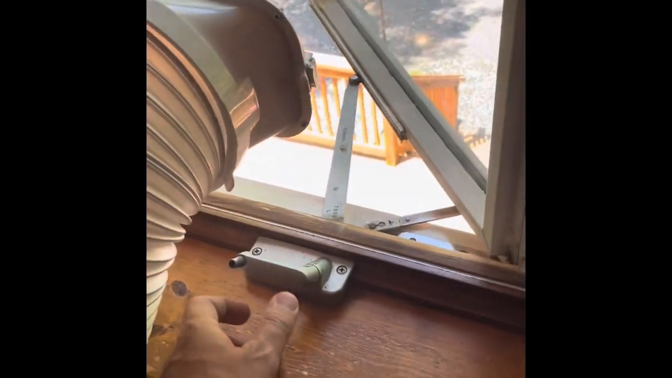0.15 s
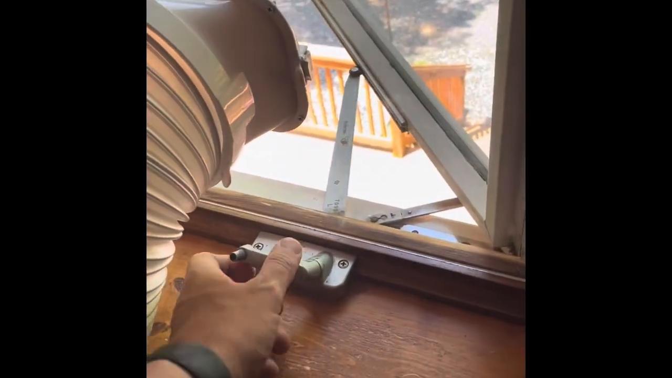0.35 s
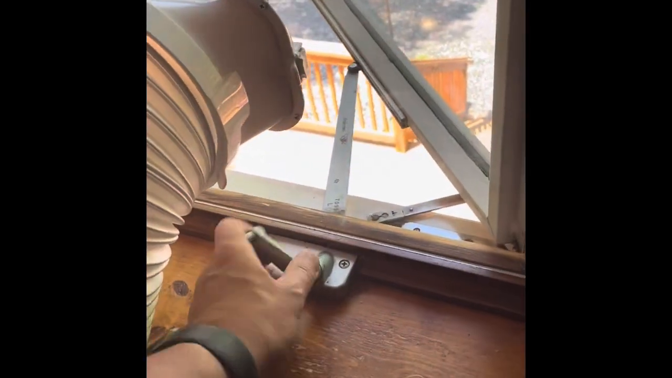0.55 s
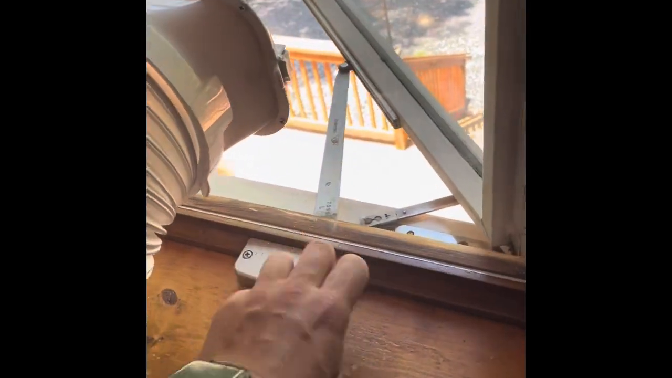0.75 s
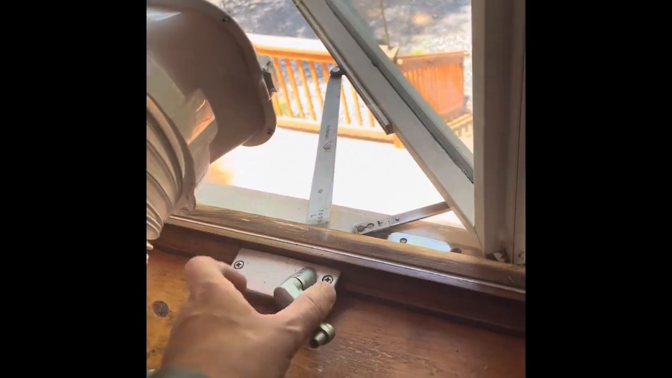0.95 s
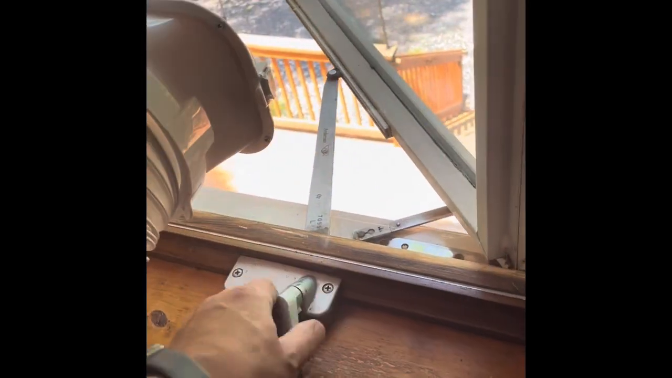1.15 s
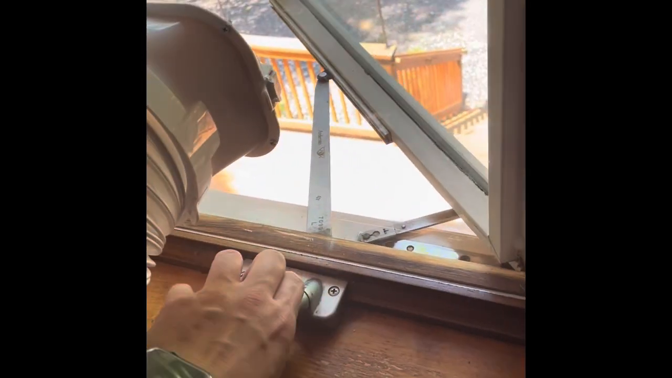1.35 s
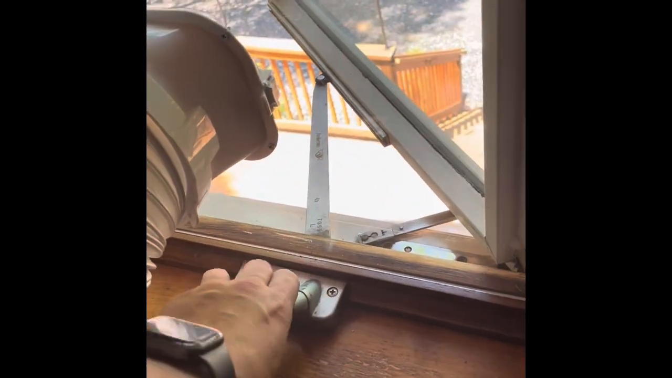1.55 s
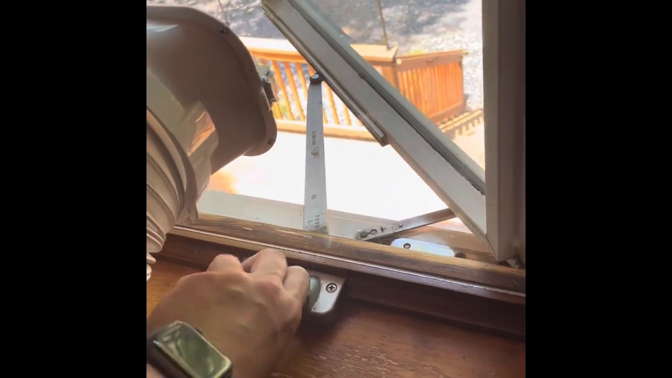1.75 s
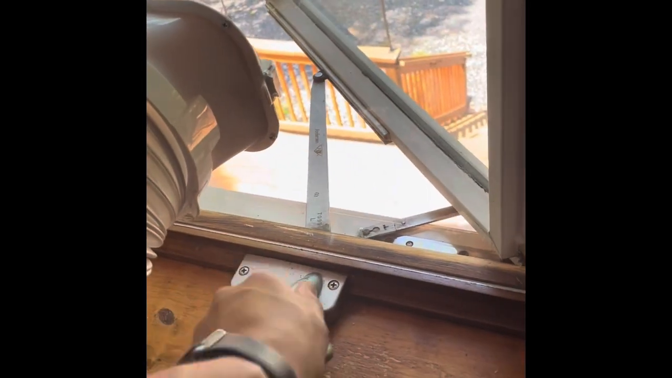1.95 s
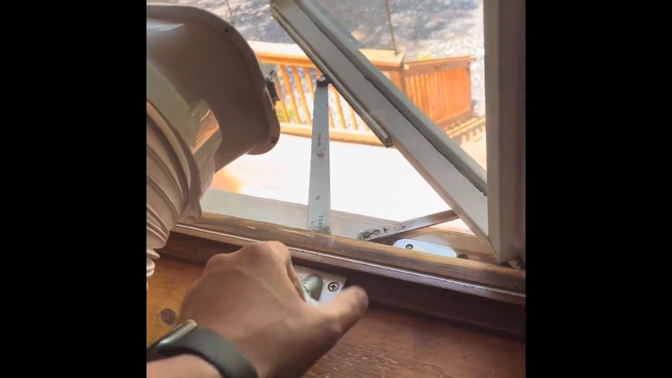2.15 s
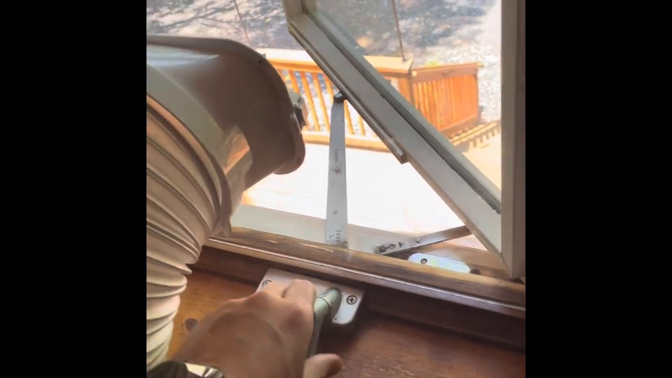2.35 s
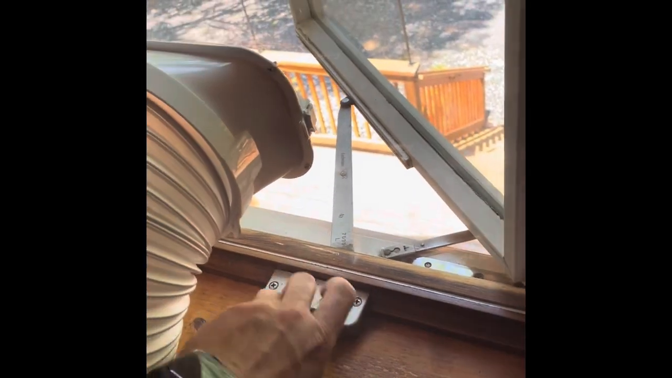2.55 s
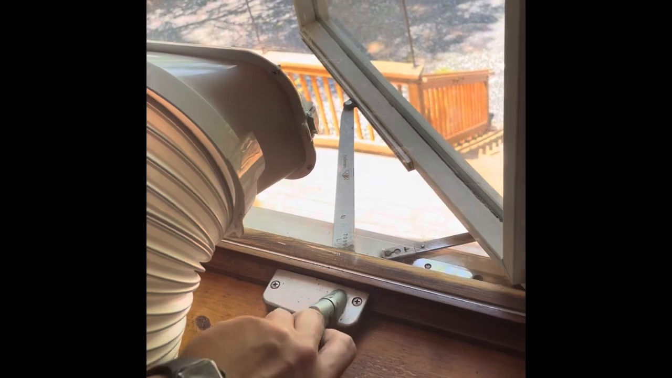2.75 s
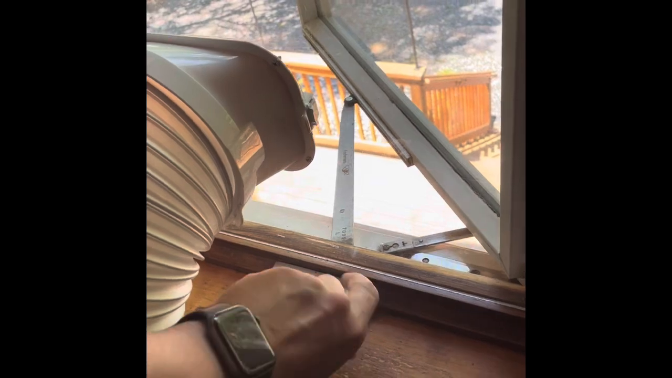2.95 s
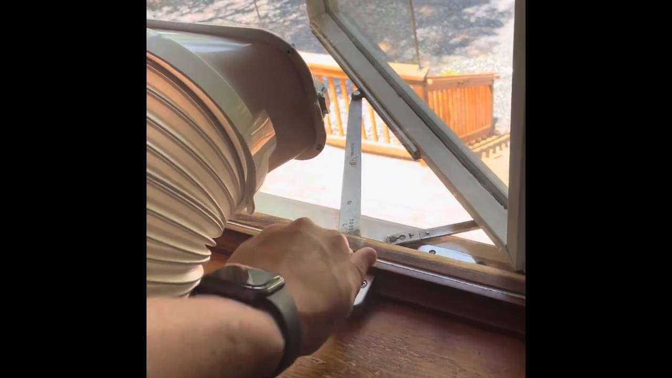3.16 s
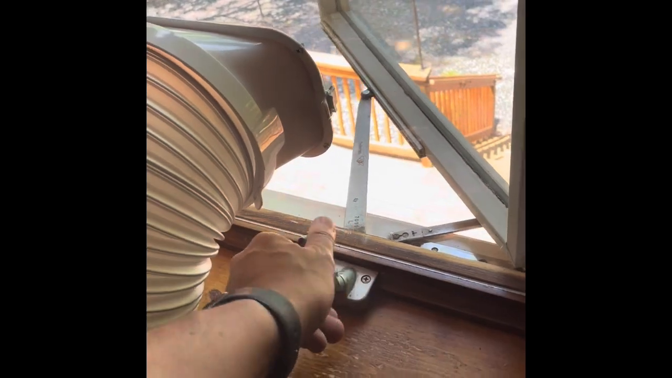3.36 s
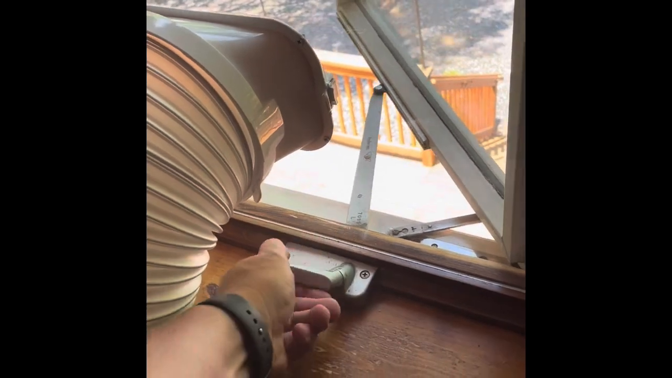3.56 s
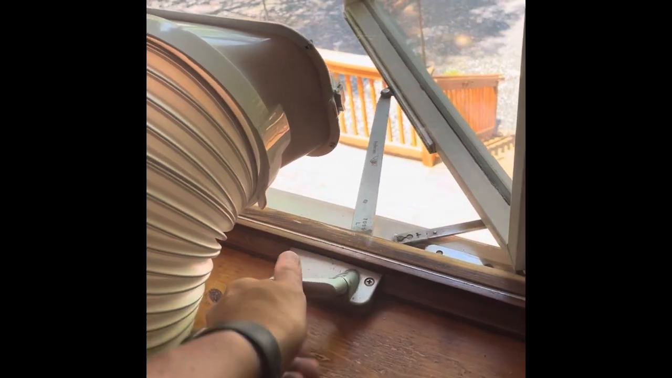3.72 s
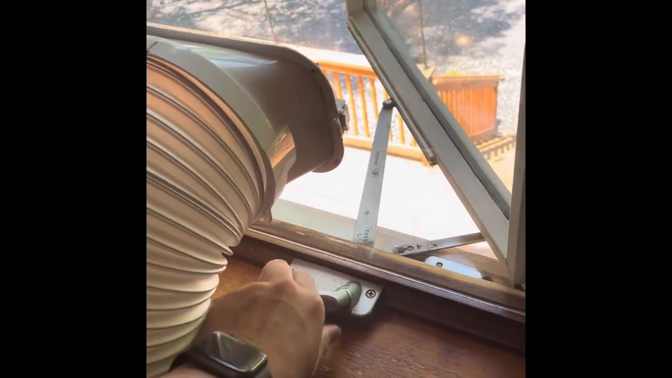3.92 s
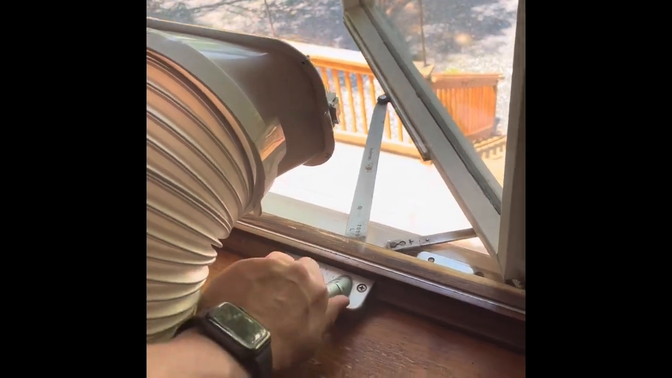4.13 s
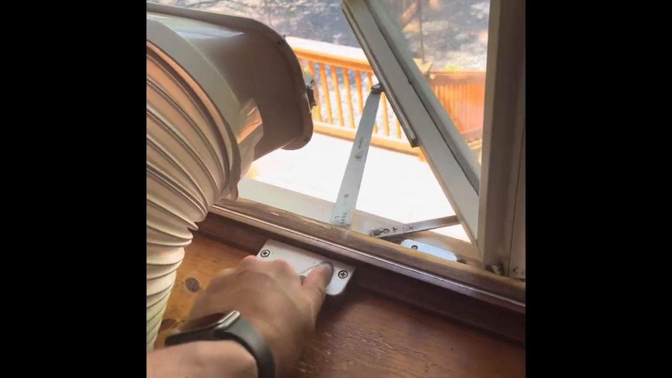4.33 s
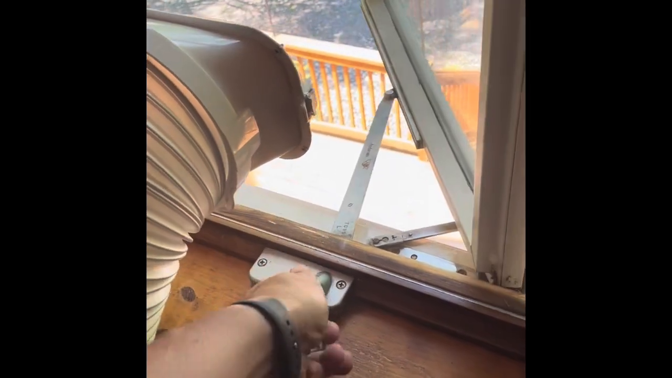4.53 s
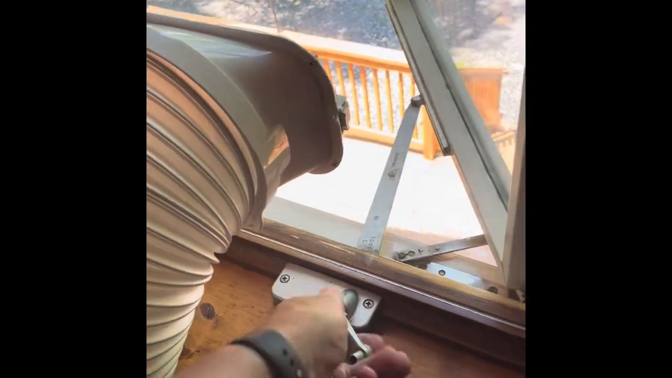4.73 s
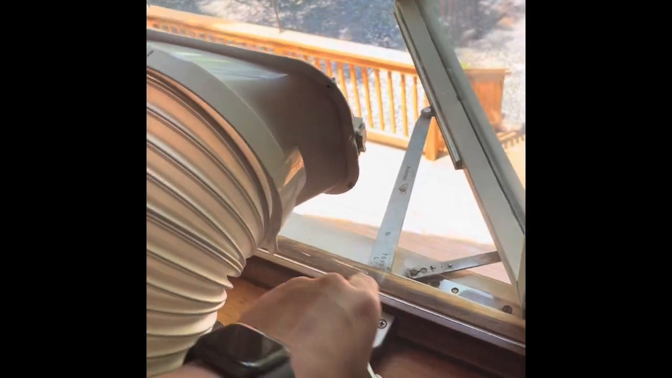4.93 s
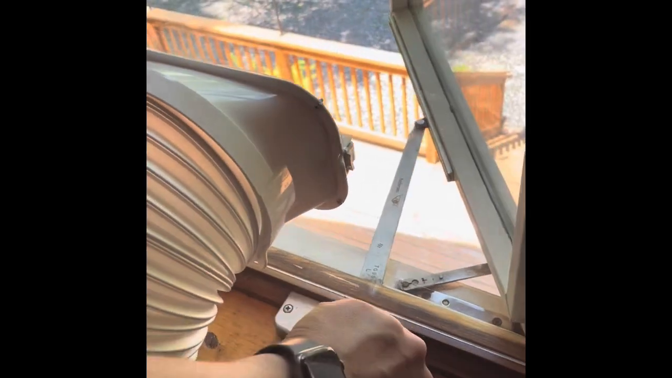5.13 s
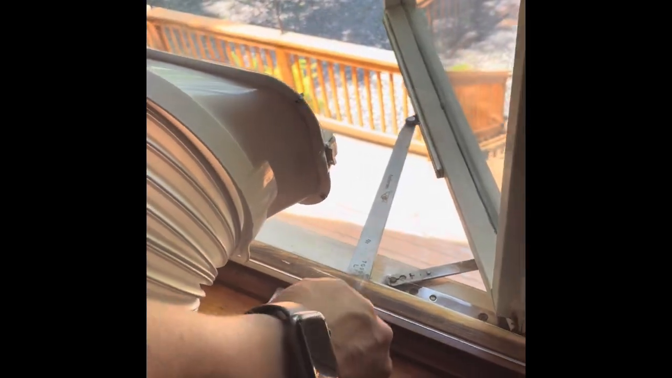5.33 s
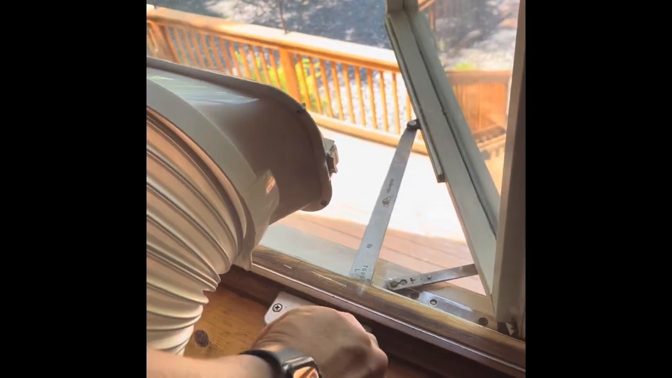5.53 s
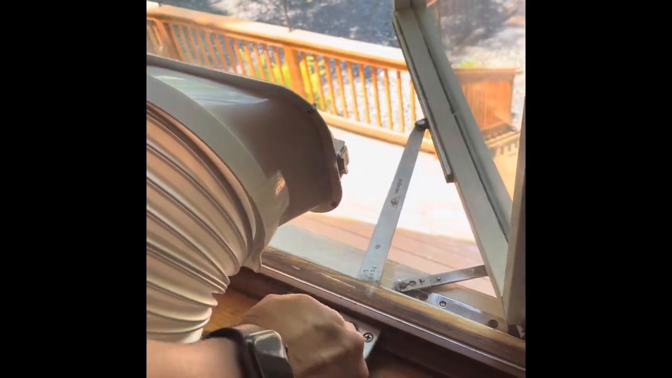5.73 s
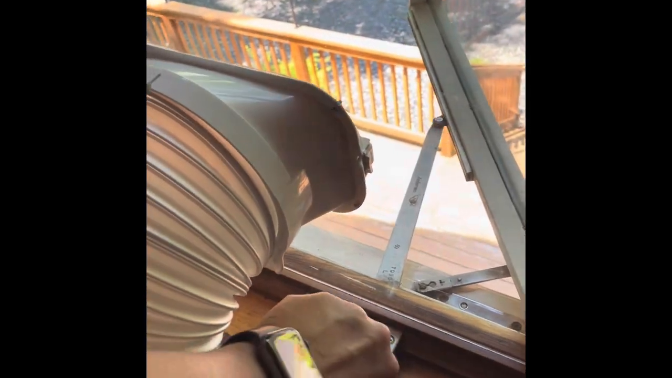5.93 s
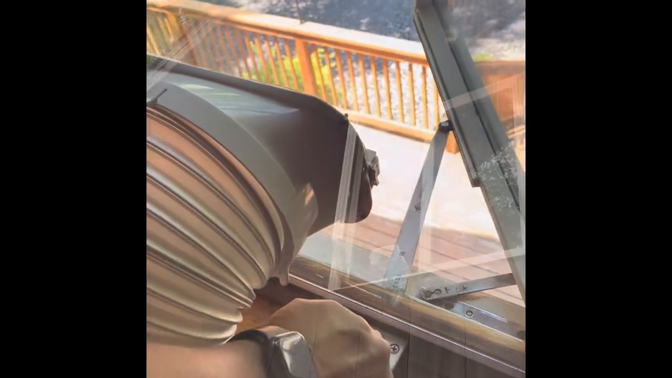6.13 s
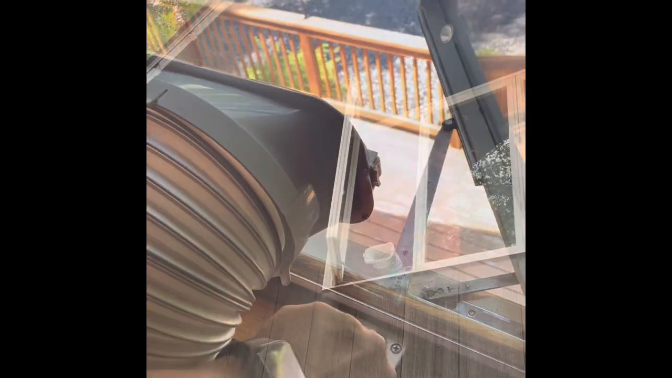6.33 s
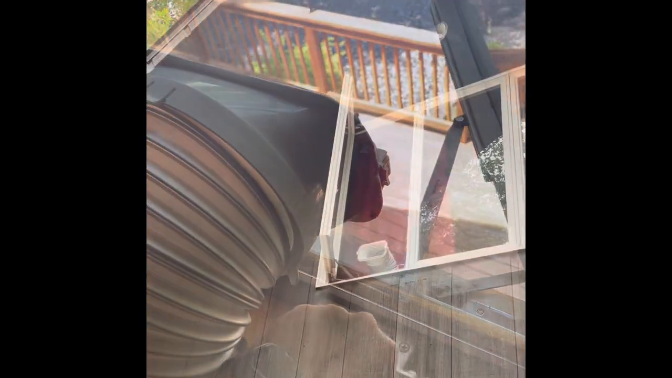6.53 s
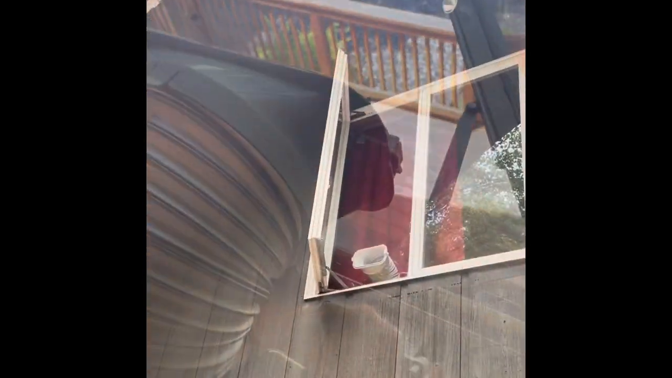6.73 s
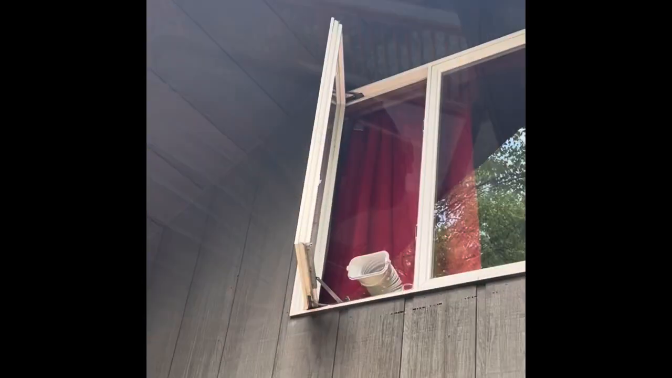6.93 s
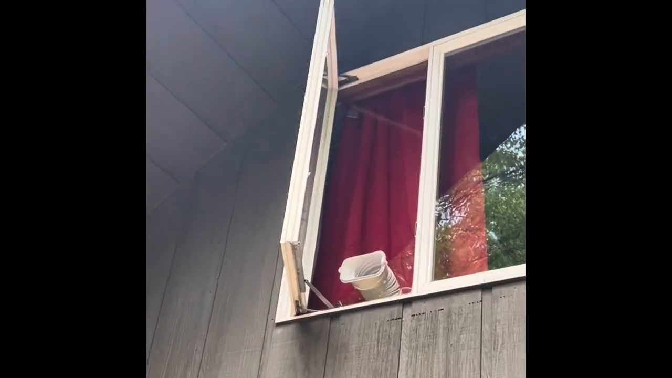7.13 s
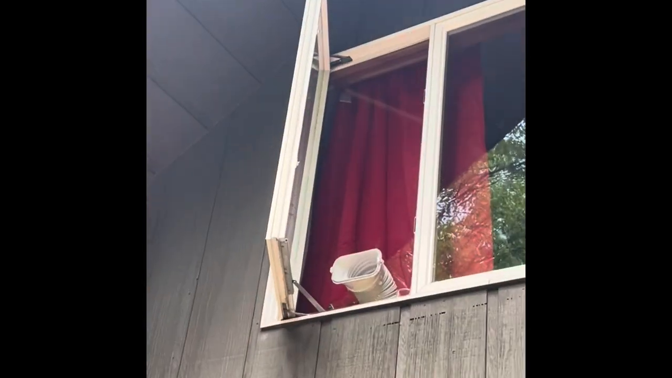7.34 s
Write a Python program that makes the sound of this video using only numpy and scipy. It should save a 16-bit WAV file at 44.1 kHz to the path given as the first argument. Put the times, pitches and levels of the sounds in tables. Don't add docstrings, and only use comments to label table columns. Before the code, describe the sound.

Close, dry, short knocks from a geared window crank on a wooden sill: two sharper knocks early, then irregular clacks, light ticks, gritty slides and skin rubs as the hand winds. After more than half the time comes the loudest, hard metallic slam. A cluster of knocks follows, then sparse ticks and faint brushing. Low rumble runs beneath, with a faint motor and tiny bird notes at the close. The small window recess adds a brief dull echo.

```python
import sys
import numpy as np
from scipy import signal
from scipy.fft import rfft, irfft, next_fast_len
from scipy.io import wavfile

SR = 44100
rng = np.random.default_rng(int(sys.argv[2]) if len(sys.argv) > 2 else 0)


def generate_wav(signal):
    frames = np.transpose(np.atleast_2d(signal))
    scaled = np.clip(frames, -1, 1) * 32767
    pcm = np.round(scaled).astype(np.int16)
    wavfile.write(sys.argv[1], SR, pcm)


def convert_level_to_amplitude(level_db):
    exponent = np.asarray(level_db, float) / 20
    return 10 ** exponent


N = 325458
RING = 3072

# start_s, arm_peak_db, weight_db (sill over arm), sharpness_db (pins over arm), clack_db (more in the cover)
HANDLE_KNOCKS = [(0.206, -90, 24, -12, -7), (0.414, -62.5, 30.5, -32, -1), (0.615, -22, -4.5, -24.5, 1),
                 (0.6475, -35.5, 10.5, -14, -3), (0.7234, -54.5, 14.5, -24, -0.5),
                 (0.8478, -71, 27, -3, -12), (1.1031, -42, -12.5, -7, 9), (1.511, -28, 12.5, -14.5, -0.5),
                 (1.7782, -57.5, 20.5, -10, 5.5), (1.9592, -26, -1.5, -11, -1), (2.1772, -37.5, -3, -5, 8),
                 (2.6198, -44.5, -1, -29, 1.5), (2.7446, -42.5, -9, -39, -2),
                 (2.855, -40.5, 4.5, -12.5, -3), (3.2816, -49, -8, -32, 9), (3.2931, -42.5, -18, -24, 7),
                 (3.3088, -42, -11, -26, 5), (3.3221, -39, -29, -26.5, 1), (4.3334, -49.5, -15, -4, 1),
                 (4.7306, -49.5, 15, -9.5, -2), (4.7685, -42.5, 1, -9.5, -1), (4.8299, -26, -2, -2, -6),
                 (4.9472, -62.5, 23.5, -4.5, -19), (5.6092, -65, 18, -3.5, -1)]
GEAR_KNOCKS = [(0.4267, -61, -6, -29, 0), (0.4723, -27, 5.5, -23, -3), (0.5559, -43.5, 8.5, -18, -7),
               (1.41, -52, -3.5, -20, 8.5), (1.815, -33, 5, -32, 2), (1.8925, -30, 2, -30.5, -1.5),
               (2.0297, -52, 19.5, -27, -1), (2.1278, -33.5, 2, -39, 1.5), (2.2046, -47.5, 12.5, -27, 1),
               (2.3619, -56, 1, -25, 8), (2.383, -46, -8, -11, 10), (2.4064, -39.5, -2.5, -11, -6),
               (2.4866, -45, 2.5, -39, -1), (3.0723, -47.5, 11, -35, 4), (3.8164, -51.5, 12, -7, -6),
               (4.6797, -59, 2, -7, -0.5), (5.0601, -31.5, 8, -38.5, -1), (5.1042, -43, 10.5, -25, -4),
               (5.1955, -29.5, 8.5, -13.5, -3), (5.3084, -41.5, 10, -20, -1.5), (5.3211, -55, 20, -31, 2.5),
               (5.4799, -58, 6, -30, 4), (5.4919, -54, 29, -31, 4), (6.8784, -60, 15, -25, 3.5),
               (6.9133, -51.5, 16, -22.5, -3)]
ARM_KNOCKS = [(0.3735, -48, -3, -44, 0), (0.5141, -50.5, 7, 3.5, -12), (0.5864, -51.5, 12, -17, -1),
              (0.6978, -41, -4, -11, -1), (1.1485, -37, -24, -20, 9), (1.1584, -40.5, -19, -25, 2),
              (1.1726, -42, 0, -14, 1), (1.271, -33.5, -5, -8.5, 4.5), (1.3899, -32, -6, -10, -2),
              (1.4386, -43, -12, -7, 1), (1.4872, -35, -2.5, -20, 4.5), (1.942, -30, -6.5, -34, 1),
              (2.2651, -42, -8.5, -37, 5.5), (3.6337, -33.5, -7, -1, -4), (4.155, -34.5, -3.5, -11.5, -10),
              (4.2314, -33, -10, -22, 6.5), (5.1581, -23, 7, -13.5, 1), (5.3747, -33.5, -5.5, -21, 2.5),
              (5.7003, -61.5, -39.5, -7, -4), (6.0107, -60, -4, -4.5, 3.5), (6.111, -42.5, -2, -2.5, -4.5),
              (6.2711, -59.5, 3.5, -3, -1), (6.4094, -56, 9, -12.5, 0.5), (6.4431, -45.5, -13, -5, -10),
              (6.48, -42.5, -4, -23, 5.5), (6.6467, -51, 3, -27, -11)]
TICKS = [(.312, -77.5, 20, -22, -3), (.737, -59.5, 13, -25, 4.5), (.909, -76, 24, -20, 3),
         (.941, -68.5, 21.5, -20, 4), (1.596, -66, 8, -25, -2), (1.803, -53.5, 15, -21, -5),
         (1.861, -53, 2, -15, 4), (1.935, -57, 19, -23.5, -4), (2.021, -49.5, 11.5, -22, 2),
         (2.236, -60, 10, -24, -5), (2.508, -43, -4.5, -32, -6), (2.698, -57.5, 12, -31, -2),
         (2.721, -57, -6, -15, -5), (2.815, -64, 15.5, -27, 0), (3.085, -56, 14.5, -30, -6),
         (3.208, -72, 18.5, -27, -3), (3.378, -52.5, 2, -15, 1.5), (3.449, -60.5, 12.5, -25, 4),
         (3.546, -55.5, 3, -13, 1), (3.731, -50, 6.5, -12, -20), (3.835, -53, 4, -25, 0.5),
         (3.915, -61.5, 15, -20, -7), (4.093, -67, 8, -21, -3), (4.132, -67, 10, -22, 6),
         (4.204, -54, -4, -12, -3), (4.315, -60.5, 13.5, -13, -4), (4.356, -52, -14, -15, 4),
         (4.695, -60, 10, 0, -4), (4.712, -55.5, 10, -5.5, 4), (4.797, -59, 20.5, -13.5, -5.5),
         (4.991, -65, 2, 2.5, -7), (5.006, -64.5, 0, -7, -1), (5.12, -59, 22, -21, -7.5),
         (5.288, -63, 20, -18, -2), (5.417, -61.5, 14, -21.5, -5), (5.46, -61.5, 13.5, -19.5, 3),
         (5.874, -71.5, 15, -20, 2.5), (6.042, -70.5, 15, -15, 4), (6.388, -63, 6, -4, -8),
         (6.587, -62, -12, -2.5, -13)]
MORE_TICKS = [(.428, -54, -5, -30, -5), (.466, -48.5, 8, -25, 1), (.487, -58, 24, -30, -3),
              (1.252, -65.5, -10, 4, -10), (1.808, -50, 8, -30, 2), (3.717, -60, 0, -9, -5),
              (3.858, -65.5, -10, 5.5, -10), (4.166, -58.5, -7, 3, -10), (4.824, -41, 0.5, -14.5, 1),
              (4.833, -48, 22.5, -30.5, -10), (5.757, -78, -10, 9, -10), (6.02, -67, 7, -18, 1),
              (6.668, -58, 0, -25, -14)]
# cover_db, share of weight_db felt by the cover, washers_over_pins_db
HANDLE_REACH = (1, 0.54, -1)
GEAR_REACH = (5.05, 0.29, -15)
ARM_REACH = (-3.5, 0.34, -25.5)
TICK_REACH = (2, 0.24, -16.5)
# pitch_hz, level_db, t60_s
SILL_MODES = [(299, -14.5, 0.057), (398, 0.5, 0.028), (435.8, 13, 0.026), (478.9, -3.5, 0.044)]
COVER_MODES = [(690.6, -7.5, 0.057), (801.6, 3, 0.028), (926.6, -0.5, 0.028), (1201, -4, 0.023)]
ARM_MODES = [(1561, -0.5, 0.03), (1809, -3.5, 0.032), (2027, 7, 0.015), (2319, 3, 0.019), (2690, -6, 0.043),
             (2990, -11, 0.045), (3380, -17, 0.046)]
PIN_MODES = [(3820, -5.5, 0.017), (4950, -0.5, 0.0098), (5386, -4.5, 0.0067), (5970, 2, 0.0041),
             (7000, 2.5, 0.0091)]
WASHER_MODES = [(6900, -7, 0.023), (8530, 3, 0.0099), (10500, -5.5, 0.0027), (11140, -3.5, 0.015),
                (11200, -7, 0.0042)]
# start_s, peak_db
STOP_SLAM = (4.8290, -8.5)
# pitch_hz, level_db, t60_s
STOP_MODES = [(411, -4, 0.048), (677, 6, 0.05), (735, -3, 0.025), (1210, -10, 0.053), (1590, -4, 0.053),
              (1823, -6, 0.034), (2282, 8, .02), (2980, -10, 0.045), (3484, -9, 0.033), (1075, -10, 0.04),
              (5950, 3, 0.01), (9300, -3, 0.006)]
# start_s, peak_db, pitch_hz
THUMPS = [(1.18, -35, 68), (1.412, -39, 71.4), (1.811, -34.5, 79.4), (2.707, -58, 68), (3.068, -46, 185),
          (3.155, -40, 201), (3.285, -37, 64), (3.32, -40.5, 66), (3.441, -50, 72), (3.446, -43, 219),
          (5.491, -45, 294), (5.87, -49.5, 210.2), (3.643, -43, 73), (3.844, -43.5, 69.4),
          (4.152, -40.5, 98), (4.353, -39, 123), (4.838, -42.5, 73), (5.884, -48, 115),
          (6.135, -51.5, 70.7), (6.272, -40, 213.9), (6.529, -46, 58.1), (6.655, -41, 116),
          (0.198, -50.5, 214), (2.715, -52.5, 152)]

# start_s, length_s, level_db, load_db (more in the gear teeth)
SLIDES = [(0.194, 0.021, -94, 9), (0.333, .04, -90, 10.5), (0.456, .05, -75, 3), (0.584, 0.065, -60, 1),
          (0.737, 0.041, -85, 11), (0.925, 0.051, -80.5, 12), (1.149, 0.17, -64.5, 3),
          (1.41, 0.07, -65, 5.5), (1.678, 0.042, -74, 5), (1.83, 0.072, -65.5, 6),
          (1.98, 0.027, -60.5, 5.5), (2.159, 0.13, -68.5, 6), (2.376, 0.027, -70, 4),
          (2.483, 0.054, -69.5, 4.5), (2.644, 0.11, -71, 0), (2.829, 0.038, -72.5, 10.5),
          (3.09, 0.021, -72.5, 6), (3.287, 0.035, -62.5, -2), (3.354, 0.093, -67.5, 4),
          (3.48, 0.13, -62, -3), (3.719, 0.007, -72, 8.5), (3.833, 0.019, -62, -3.5),
          (3.924, 0.041, -61.5, -10.5), (4.035, .11, -86.5, 17.5), (4.18, 0.16, -71, 7),
          (4.326, 0.12, -57, -9.5), (4.44, 0.2, -65, -3.5), (4.804, 0.017, -59.5, -0.5),
          (5, 0.29, -69.5, 5), (5.355, 0.25, -82.5, 9), (6.049, 0.043, -87, 10), (6.271, 0.054, -74.5, 0.5),
          (6.397, 0.1, -70, 1.5), (6.5, .06, -77, 0), (6.893, 0.092, -76, -8), (6.965, 0.58, -79, 2.5)]
# pitch_hz, level_db, t60_s
TRACK_MODES = [(1010, -3.5, 0.023), (1530, 2.5, 0.011), (1830, -5, 0.034), (2066, -0.5, 0.032),
               (2270, -0.5, 0.032), (2840, -5, 0.041)]
# pitch_hz, level_db (per Hz)
GRIND_SPECTRUM = [(120, -34), (200, -2), (226, -5.5), (296, -14), (437, -6.5), (754, -18), (1400, -28.5),
                  (1820, -57), (3080, -120)]
SLIDE_SPECTRUM = [(530, -19.5), (900, -6), (1520, -1), (1670, -8), (2260, -16), (2540, -9), (2810, -5),
                  (3600, -18), (4680, -50), (7920, -120)]

# start_s, length_s, level_db, dryness_db (sheen over skin)
RUBS = [(0, 0.065, -73.5, -10), (0.593, 0.15, -75.5, -8), (0.961, 0.21, -73, -6.5), (1.118, 0.23, -70, -22),
        (1.415, 0.043, -63, -13.5), (1.794, 0.11, -75.5, -4), (1.985, 0.088, -75.5, -8.5),
        (2.158, 0.24, -78, -18), (2.52, 0.014, -73.5, -8), (2.631, 0.12, -77, -2), (2.872, .03, -88, -5),
        (3.069, 0.02, -81, -6), (3.297, 0.38, -73, -19), (3.725, 0.023, -71.5, -9),
        (3.916, 0.058, -56, -24.5), (4.155, 0.13, -70.5, -17.5), (4.329, 0.11, -66.5, -9.5),
        (4.483, 0.18, -77, -13), (4.72, 0.13, -74.5, -2.5), (4.831, 0.054, -64.5, -11),
        (4.966, 0.36, -72, -18), (5.613, 0.0091, -79, -2), (5.761, 0.033, -82.5, -3),
        (5.855, 0.025, -76, -19), (6.124, 0.015, -72, -9.5), (6.238, 0.031, -71, -18),
        (6.277, 0.074, -61.5, -23), (6.388, 0.03, -53, -31), (6.442, 0.016, -60, -30),
        (6.525, 0.059, -70, -24), (6.917, 0.071, -78, -32)]
# start_s, length_s, level_db
SWISHES = [
    (5.768, 0.038, -74.5),
    (5.852, 0.038, -70),
]
# pitch_hz, level_db (per Hz)
SKIN_SPECTRUM = [(1300, -31), (1900, -11.5), (2900, -0.5), (3750, -6.5), (4800, -2.5), (7000, -13),
                 (9100, -44), (15400, -120)]
SHEEN_SPECTRUM = [(6000, -22), (7500, -0.5), (9000, -4.5), (11000, -10.5), (12500, -1), (13500, -13.5),
                  (16000, -40)]
SLEEVE_SPECTRUM = [(2800, -25.5), (3600, -7), (4500, 0), (5900, -6), (7000, -24), (8000, -60)]

# time_s, level_db
GRIP = [
    (0.0, -60.5),
    (0.61, -51),
    (7.38, -55),
]
# pitch_hz, level_db (per Hz)
RUMBLE_SPECTRUM = [(12, -36.5), (20, -11.5), (60, 7), (183, -7), (248, -16.5), (292, -13), (320, -17.5),
                   (420, -35), (700, -120)]
# pitch_hz, level_db (rms)
MOTOR_LINES = [(86.1, -58.5), (145.3, -58), (231.5, -73.5), (290.7, -74.5)]
# time_s, level_db
MOTOR_SWELL = [(6.2, -15), (6.6, -2.5), (7.0, 1.5), (7.38, 6.5)]
# start_s, length_s, level_db, from_hz, to_hz
BIRD_NOTES = [
    (7.23, 0.14, -69.5, 2760, 3350),
    (7.32, 0.035, -76, 3900, 4700),
]

# pitch_hz, likeness (0 to 1)
LIKENESS = [(40, .96), (300, .94), (1100, .6), (2000, .88), (4000, .7), (6500, .8), (7700, 1), (9300, .65),
            (11000, 1), (12700, .5)]
# pitch_hz, share (0 to 1)
MERGED_SHARE = [(120, 0), (250, .3), (6700, .3), (7100, 1), (8400, 1), (8900, .2), (9800, .2), (10300, 1),
                (11700, 1), (12200, 0)]
# pitch_hz, lead_rad
LEFT_LEAD = [(0, 0), (1600, -.1), (2800, 1.1), (3900, 1.6), (4400, 1.5), (4850, -.4), (5500, .4),
             (7250, 2.95), (8300, 3.3), (10300, 2 * np.pi), (11800, 2 * np.pi), (13300, 3 * np.pi)]
# pitch_hz, level_db
LEFT_OVER_RIGHT = [(40, 0), (200, 1), (400, 3), (700, 4), (1200, 2.3), (2100, 1.2), (3900, .2), (6000, 0)]

RISE_DB_PER_S, FALL_DB_PER_S = 265.5, 194
RUB_RISE_DB_PER_S, RUB_FALL_DB_PER_S = 699.5, 399
JOLT_RISE_DB_PER_S = 695


def every_knock():
    kinds = [(HANDLE_KNOCKS, HANDLE_REACH), (GEAR_KNOCKS, GEAR_REACH), (ARM_KNOCKS, ARM_REACH)]
    return np.transpose(sorted((*row, *reach) for rows, reach in kinds for row in rows))


def struck(modes, contact_s, chatter_s, crack_db, tail_db, tail_t60, count, uneven=1):
    t = np.arange(RING) / SR
    chatter = rng.standard_normal((count, RING)) ** 3 * np.exp(-t / chatter_s)
    chance = uneven * rng.standard_normal((count, len(modes), 2))
    hz, level_db, t60 = np.transpose(modes)
    tuning = hz * (1 + 0.026 * chance[..., 0])
    strength = convert_level_to_amplitude(level_db + 3.9 * chance[..., 1])
    swell = (1 - np.exp(-t / contact_s)) ** 2
    body = 0
    for k in range(len(hz)):
        tone = np.sin(2 * np.pi * tuning[:, k, None] * t)
        body = body + strength[:, k, None] * convert_level_to_amplitude(-60 * t / t60[k]) * tone
    rings = peak_one(signal.fftconvolve(chatter, body * swell, axes=1)[:, :RING])
    dying = convert_level_to_amplitude(crack_db - 60 * t / t60.mean()) + convert_level_to_amplitude(tail_db - 60 * t / tail_t60)
    band = signal.butter(2, [hz[0] * 0.77, hz[-1] * 0.9], "band", fs=SR, output="sos")
    crack = signal.sosfilt(band, rng.standard_normal((count, RING)) * dying * swell)
    crack = crack * np.sqrt(SR / 8 / (hz[-1] - hz[0]))
    return peak_one(rings + crack) * np.cos(np.pi / 2 * t / t[-1])


def five_bodies(arm_db, weight_db, sharp_db, clack_db, to_cover_db, felt, to_washers_db):
    n = len(arm_db)
    sill_db = arm_db + weight_db
    cover_db = arm_db + felt * weight_db + to_cover_db + clack_db
    pins_db = arm_db + sharp_db
    washers_db = pins_db + to_washers_db
    sill = convert_level_to_amplitude(sill_db - 0.5) * struck(SILL_MODES, 0.0096, 0.0034, -16.0, -30.5, 0.13, count=n)
    cover = convert_level_to_amplitude(cover_db - 0.1) * struck(COVER_MODES, 0.00076, 0.0018, -0.025, -24.0, 0.17, count=n)
    arm = convert_level_to_amplitude(arm_db - 3.5) * struck(ARM_MODES, 0.00068, 0.00016, -3.5, -25.5, 0.21, count=n)
    pins = convert_level_to_amplitude(pins_db + 5.5) * struck(PIN_MODES, 0.000085, 0.0011, -1.2, -28.5, 0.086, count=n)
    washers = convert_level_to_amplitude(washers_db + 6.0) * struck(WASHER_MODES, 0.0001, 0.0015, -1.3, -31.0, 0.055, count=n)
    return sill + cover + arm + pins + washers


def slack_knocks(columns):
    start, *mix = columns[..., None]
    return laid_out(start[:, 0] - 0.0008, five_bodies(*mix))


def with_reach(rows, reach):
    return np.transpose([(*row, *reach) for row in rows])


def end_stop():
    start, peak_db = STOP_SLAM
    slam = struck(STOP_MODES, 0.0006, 0.00004, -14.5, -29.5, 0.04, count=1, uneven=0.078)
    return laid_out(np.array([start]), convert_level_to_amplitude(peak_db) * slam)


def thumps():
    start, peak_db, hz = np.transpose(THUMPS)[..., None]
    cycles = hz * np.arange(RING) / SR
    swell = np.sin(np.pi * np.clip(cycles / 3.35, 0, 1) ** 0.67) ** 2
    return laid_out(start[:, 0], convert_level_to_amplitude(peak_db) * np.sin(2 * np.pi * cycles) * swell)


def grind():
    start, length, slide_db, load_db = np.transpose(SLIDES)
    under_load = strokes(start, length, slide_db + load_db + 9.5, -78.5)
    knock_s, arm_db, weight_db = every_knock()[:3]
    after_knock_db = 0.57 * (arm_db + weight_db) - 32.5
    round_knocks = strokes(knock_s, 0 * knock_s, after_knock_db, -99, JOLT_RISE_DB_PER_S)
    teeth = rattle(SILL_MODES + COVER_MODES, per_s=130, spread_db=2.5, ring_on=0.41)
    teeth = rms_one(signal.lfilter([0.1], [1, -0.9], teeth))
    texture = banded_noise(GRIND_SPECTRUM, patchy_db=3.5, grain_db=3.5) + convert_level_to_amplitude(-5.5) * teeth
    return np.hypot(under_load, round_knocks) * convert_level_to_amplitude(-3.5) * texture


def slider():
    start, length, level_db, _ = np.transpose(SLIDES)
    grit = convert_level_to_amplitude(3) * rattle(TRACK_MODES, per_s=1500, spread_db=3.0, ring_on=1)
    scrape = banded_noise(SLIDE_SPECTRUM, patchy_db=1.5, grain_db=1.0)
    return strokes(start, length, level_db, -88.5) * convert_level_to_amplitude(-7.5) * (scrape + grit)


def rubbing():
    start, length, level_db, dry_db = np.transpose(RUBS)
    pace = RUB_RISE_DB_PER_S, RUB_FALL_DB_PER_S
    skin = strokes(start, length, level_db, -85, *pace)
    skin = skin * banded_noise(SKIN_SPECTRUM, patchy_db=3.0, grain_db=2.0)
    sheen = strokes(start, length, level_db + dry_db, -99, *pace) * convert_level_to_amplitude(8.5)
    sheen = sheen * banded_noise(SHEEN_SPECTRUM, patchy_db=4.5, grain_db=2.0)
    return skin + sheen


def sleeve():
    swish = strokes(*np.transpose(SWISHES), -130, RUB_RISE_DB_PER_S, RUB_RISE_DB_PER_S)
    return swish * banded_noise(SLEEVE_SPECTRUM, patchy_db=3.0, grain_db=2.5)


def rumble():
    start, peak_db, _ = np.transpose(THUMPS)
    grip = convert_level_to_amplitude(in_time(GRIP)[0] - 2.0)
    shake_s = np.full(len(start), 0.069)
    after_thumps = strokes(start, shake_s, peak_db - 8.5, -99, JOLT_RISE_DB_PER_S)
    return np.hypot(grip, after_thumps) * banded_noise(RUMBLE_SPECTRUM, patchy_db=2.5, grain_db=3.5)


def recess(x, wet_db, t60, cut_hz):
    t = np.arange(RING * 2) / SR
    echo = rng.standard_normal((2, len(t))) * convert_level_to_amplitude(-60 * t / t60) * (t > 0.003)
    echo = echo + 0.74 * (echo.mean(axis=0) - echo)
    echo = signal.lfilter(*signal.butter(1, cut_hz, fs=SR), echo)
    return convert_level_to_amplitude(wet_db) * signal.fftconvolve(x, rms_one(echo) / np.sqrt(len(t)), axes=1)[:, :N]


def motor():
    lines = 0
    for hz, level_db in MOTOR_LINES:
        phase = 2 * np.pi * np.cumsum(hz + 0.3 * drift(2.2)) / SR
        lines = lines + convert_level_to_amplitude(level_db + 2.0 + 0.6 * drift(5)) * np.sin(phase)
    return lines * convert_level_to_amplitude(in_time(MOTOR_SWELL)[0])


def bird():
    t, out = np.arange(N) / SR, 0
    for start, length, level_db, from_hz, to_hz in BIRD_NOTES:
        hz = np.interp(t, [start, start + length], [from_hz, to_hz])
        blur = rms_one(signal.lfilter(*signal.butter(2, 220, fs=SR), rng.standard_normal((2, N))))
        gain = strokes(*np.array([[start], [length], [level_db]]), -130)
        out = out + gain * blur * np.sin(2 * np.pi * np.cumsum(hz) / SR)
    return out


def banded_noise(spectrum, patchy_db, grain_db):
    lowest, highest = spectrum[1][0], spectrum[-3][0]
    edges = lowest * 2 ** np.arange(-1 / 3, np.log2(highest / lowest) + 0.5, 1 / 3)
    out, together = 0, drift(11)
    white = rng.standard_normal((2, 2, N)) * convert_level_to_amplitude(grain_db * drift(150))
    for k, (low, high) in enumerate(zip(edges, edges[1:])):
        band = signal.butter(2, [low, high], "band", fs=SR, output="sos")
        same, other = signal.sosfilt(band, white[k % 2])
        hz = np.sqrt(low * high)
        alike = np.clip(at_hz(LIKENESS, hz), 0, 1)
        gain = convert_level_to_amplitude(at_hz(spectrum, hz) + patchy_db * (0.66 * together + drift(15)))
        out = out + gain * (np.sqrt(1 + alike) * same + np.sqrt(1 - alike) * other * [[1], [-1]])
    return rms_one(out)


def rattle(modes, per_s, spread_db, ring_on):
    sizes = convert_level_to_amplitude(spread_db * np.minimum(rng.exponential(1, N), 5)) * rng.choice([-1, 1], N)
    caught = rng.random(N) < per_s * convert_level_to_amplitude(5 * drift(12)) / SR
    catches = sizes * caught + 1e-18
    out = 0
    for k, (hz, level_db, t60) in enumerate(modes):
        r = convert_level_to_amplitude(-60 / (ring_on * t60 * SR))
        w = 2 * np.pi * hz / SR
        push = (-1) ** k * convert_level_to_amplitude(level_db) * np.sin(w)
        out = out + signal.lfilter([0, push], [1, -2 * r * np.cos(w), r * r], catches)
    return rms_one(out)


def strokes(start, length, level_db, rest_db, rise_db=RISE_DB_PER_S, fall_db=FALL_DB_PER_S):
    t = np.arange(0, N, 64) / SR
    before = rise_db * np.maximum(start[:, None] - t, 0)
    after = fall_db * np.maximum(t - (start + length)[:, None], 0)
    power = convert_level_to_amplitude(level_db[:, None] - before - after) ** 2
    return np.interp(np.arange(N) / SR, t, np.sqrt(power.sum(axis=0) + convert_level_to_amplitude(rest_db) ** 2))


def drift(rate):
    r = np.exp(-80 * np.pi * rate / SR)
    slow = signal.lfilter([1], [1, -2 * r, r * r], rng.standard_normal(N // 40 + 2002))[2000:]
    return np.interp(np.arange(N) / 40, np.arange(len(slow)), rms_one(slow))


def laid_out(times, sounds):
    out = np.zeros((2, N + RING))
    sides_db = 0.4 * rng.standard_normal(len(times))
    for start, sound, side_db in zip((times * SR).astype(int), sounds, sides_db):
        out[:, start:start + RING] += sound * convert_level_to_amplitude(side_db * np.array([[1], [-1]]))
    return out[:, :N]


def in_time(rows):
    s, *columns = np.transpose(rows)
    return [np.interp(np.arange(N) / SR, s, c) for c in columns]


def at_hz(points, hz):
    table_hz, values = np.transpose(points)
    return np.interp(np.log(hz), np.log(table_hz), values)


def rms_one(x):
    return x / np.sqrt(np.mean(x ** 2) + 1e-20)


def peak_one(x):
    return x / np.abs(x).max(axis=1)[:, None]


def merged(x):
    size = next_fast_len(N)
    both = rfft(x, size)
    share = np.interp(np.fft.rfftfreq(size, 1 / SR), *np.transpose(MERGED_SHARE))
    return irfft(both + share * (both.mean(axis=0) - both), size)[:, :N]


def scene():
    hits = slack_knocks(every_knock()) + slack_knocks(with_reach(TICKS, TICK_REACH)) + end_stop() + thumps()
    near_echo = recess(hits, wet_db=-14.5, t60=0.016, cut_hz=2100)
    far_echo = recess(hits, wet_db=-21, t60=0.17, cut_hz=2300)
    more_ticks = slack_knocks(with_reach(MORE_TICKS, HANDLE_REACH))
    spread = grind() + slider() + rubbing() + sleeve() + rumble() + motor() + bird()
    return hits + near_echo + far_echo + more_ticks + merged(spread)


def low_pass(x):
    return signal.sosfilt(signal.butter(12, 13230, fs=SR, output="sos"), x)


def record(dry):
    size = next_fast_len(N)
    hz = np.fft.rfftfreq(size, 1 / SR)
    lead = np.interp(hz, *np.transpose(LEFT_LEAD))
    half = convert_level_to_amplitude(at_hz(LEFT_OVER_RIGHT, hz + 1) / 2) * np.exp(0.5j * lead)
    ports = irfft(rfft(dry, size) * [half, 1 / half], size)[:, :N]
    return low_pass(ports)


dry = scene()
out = record(dry)
generate_wav(out)
```